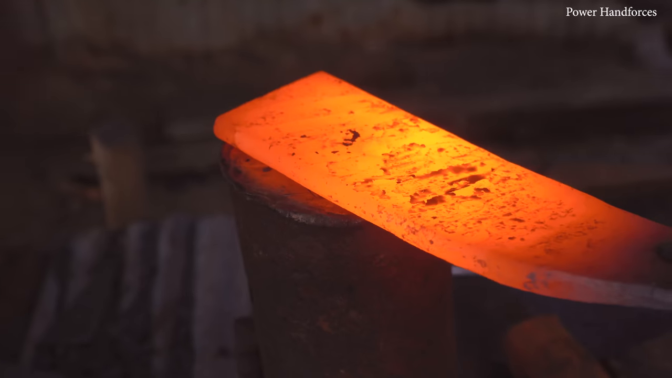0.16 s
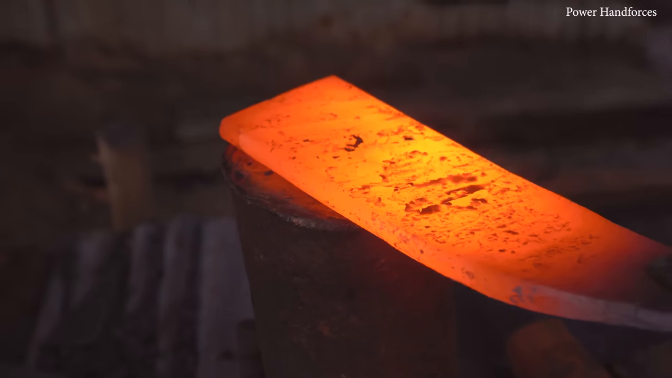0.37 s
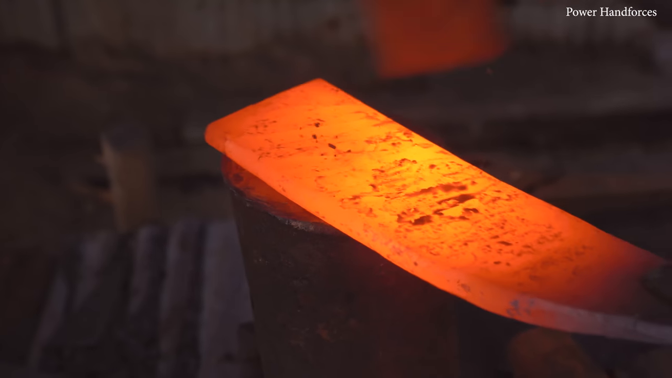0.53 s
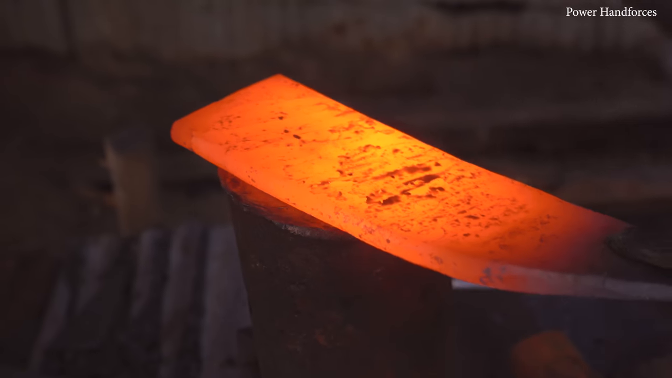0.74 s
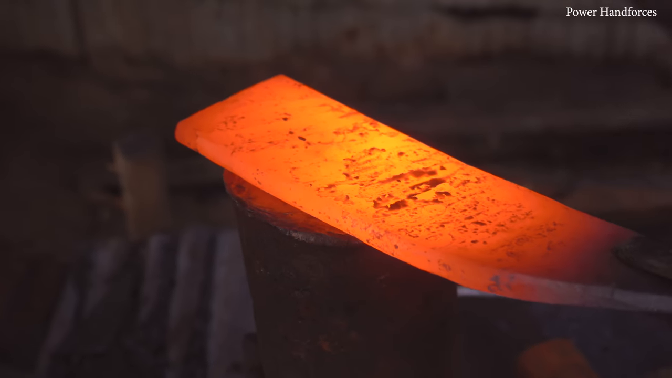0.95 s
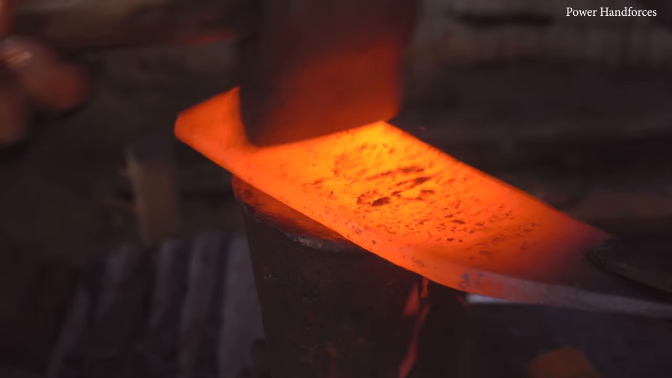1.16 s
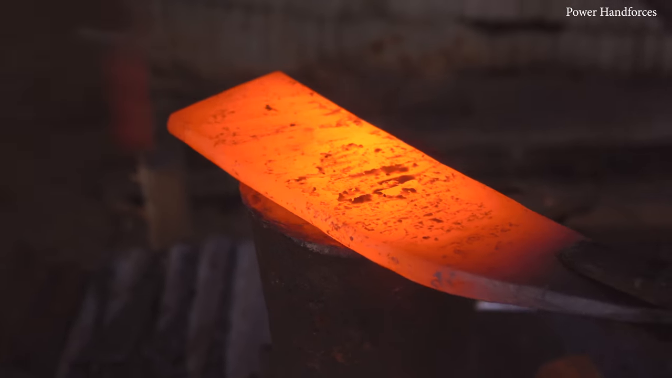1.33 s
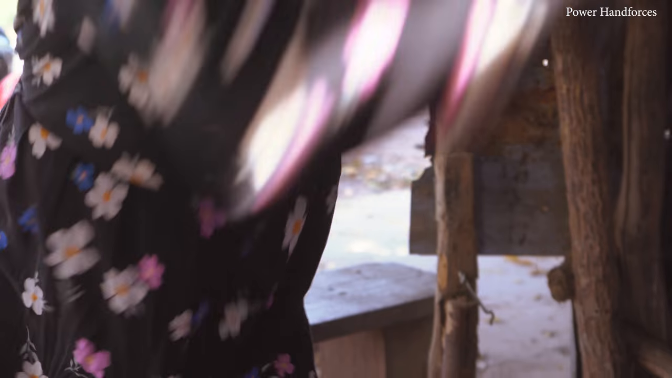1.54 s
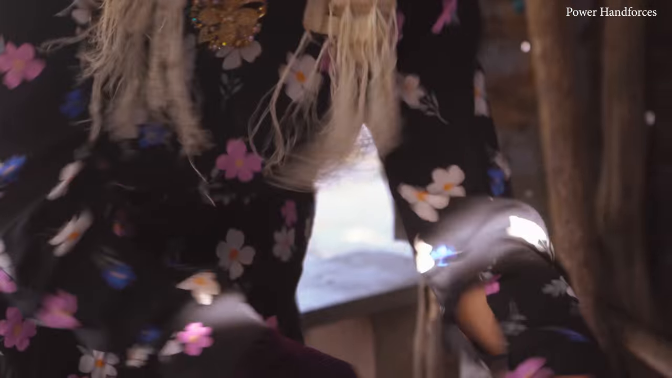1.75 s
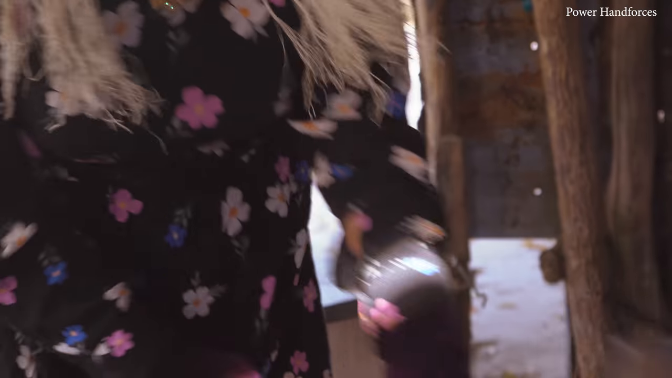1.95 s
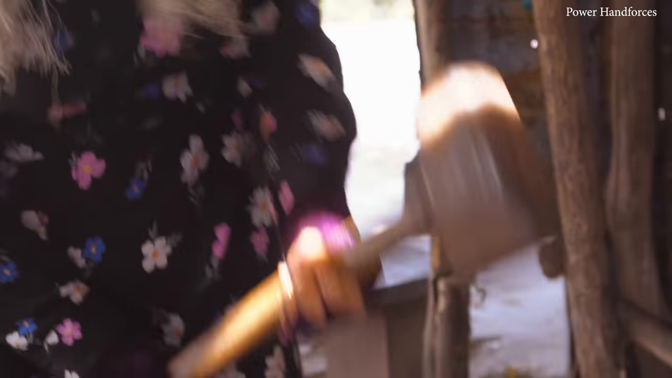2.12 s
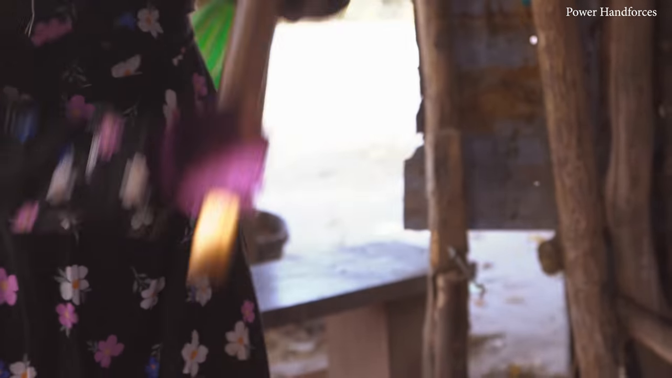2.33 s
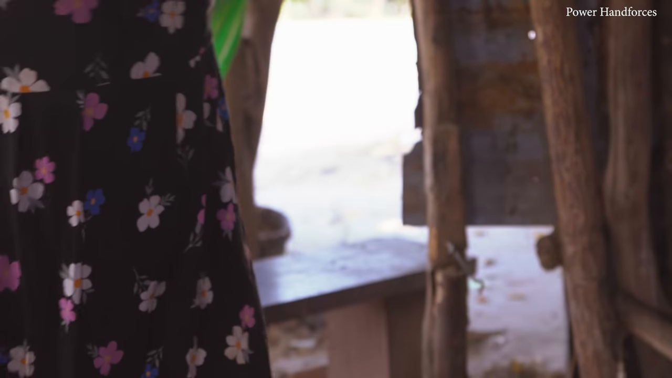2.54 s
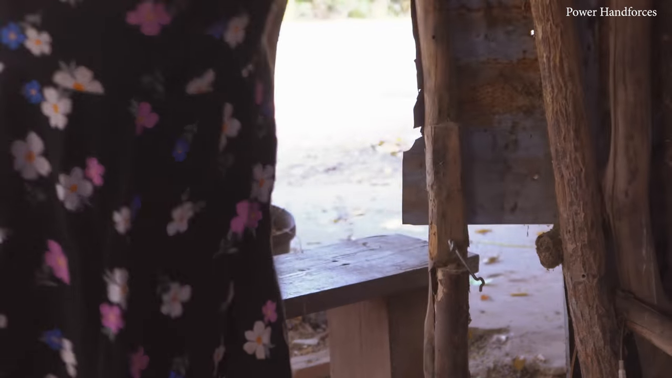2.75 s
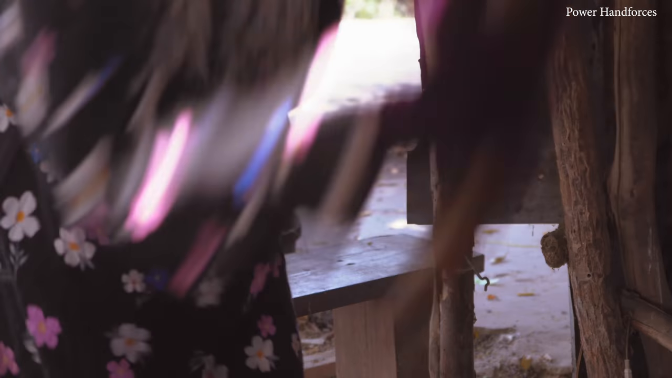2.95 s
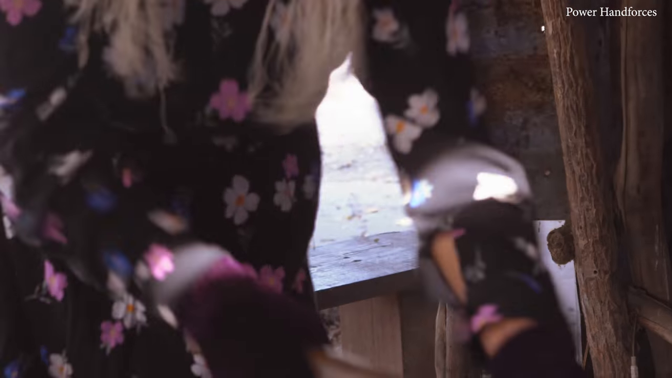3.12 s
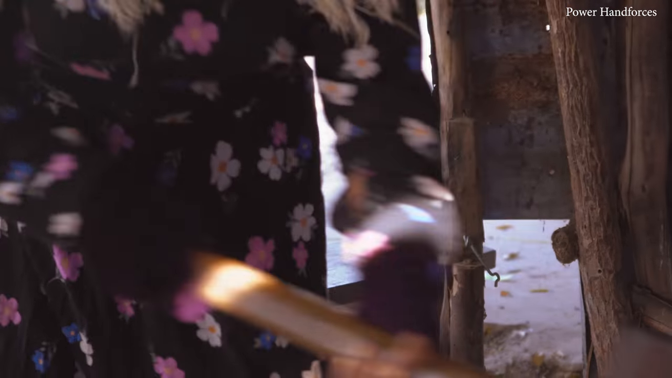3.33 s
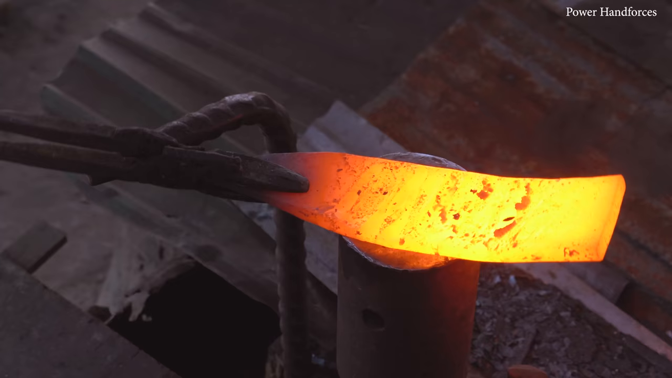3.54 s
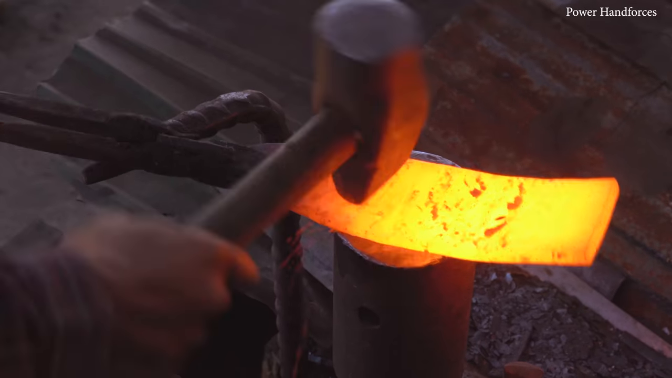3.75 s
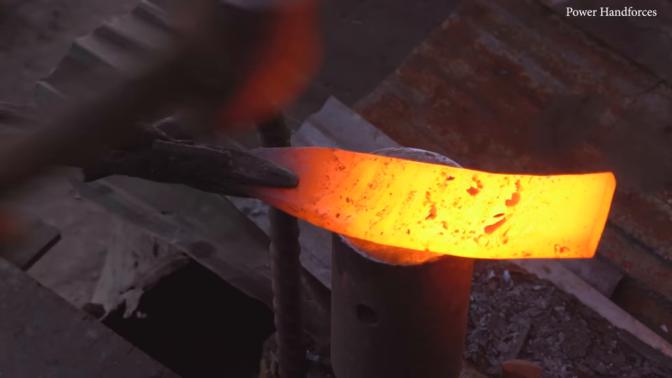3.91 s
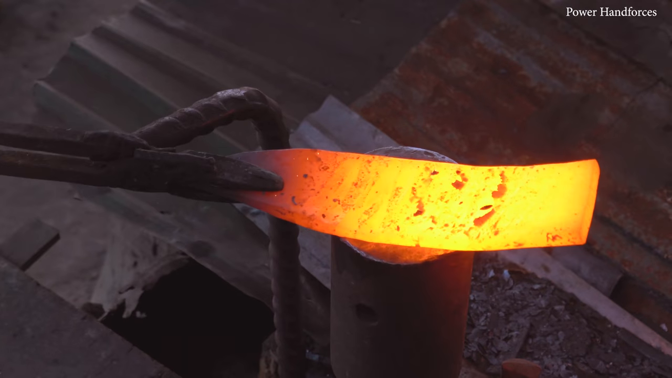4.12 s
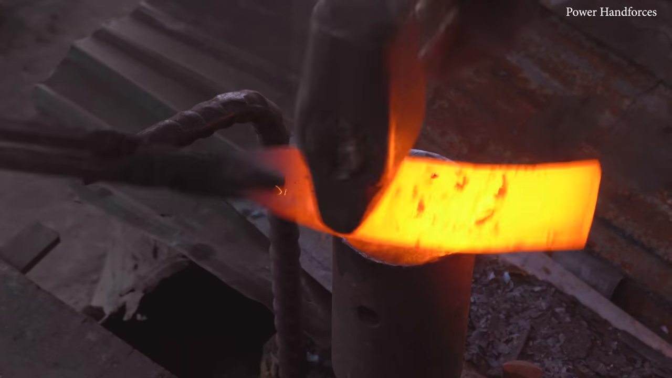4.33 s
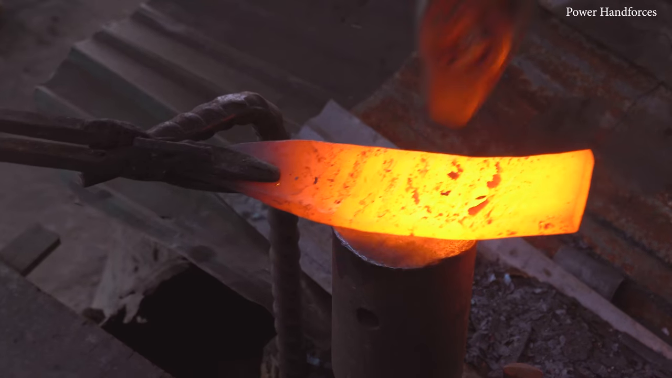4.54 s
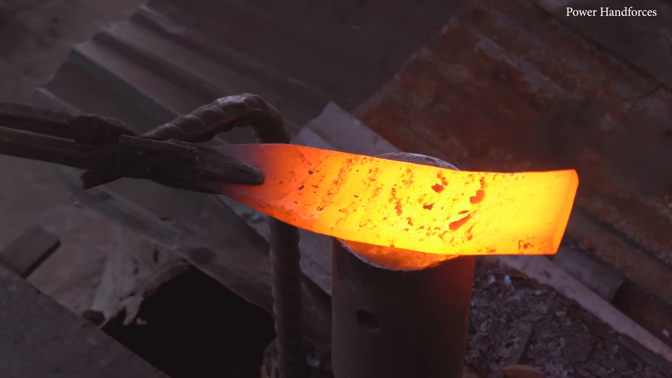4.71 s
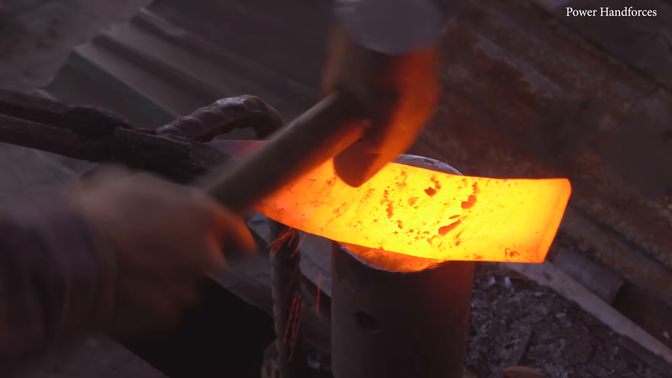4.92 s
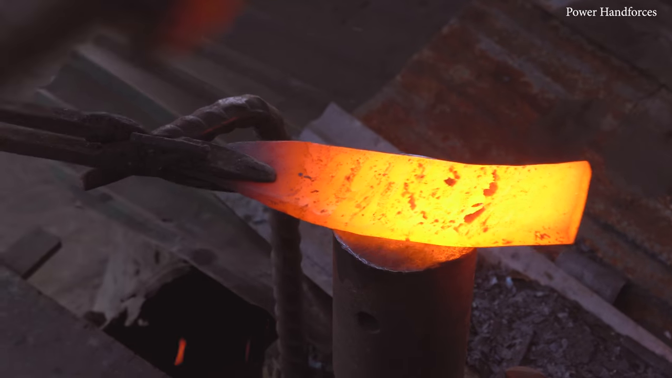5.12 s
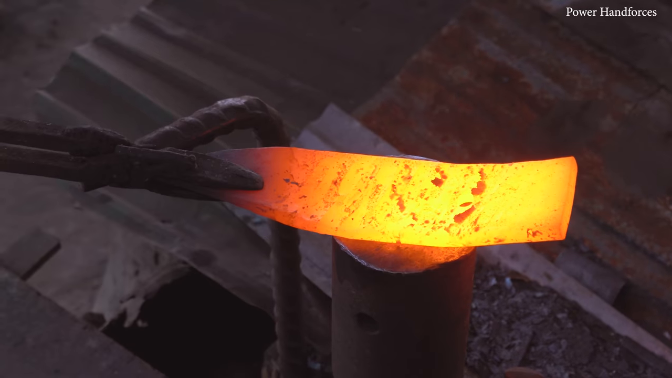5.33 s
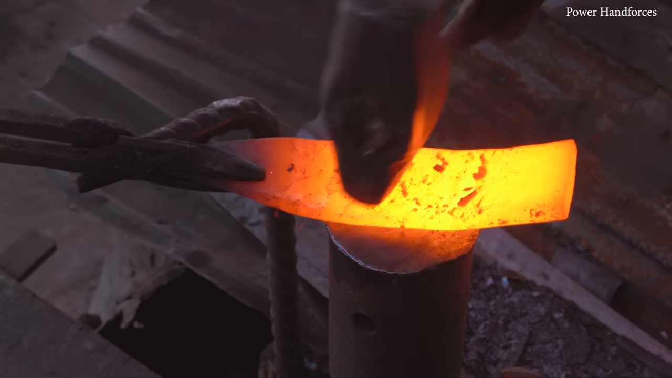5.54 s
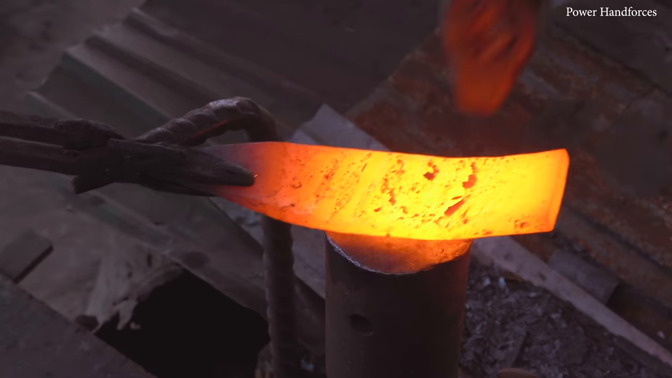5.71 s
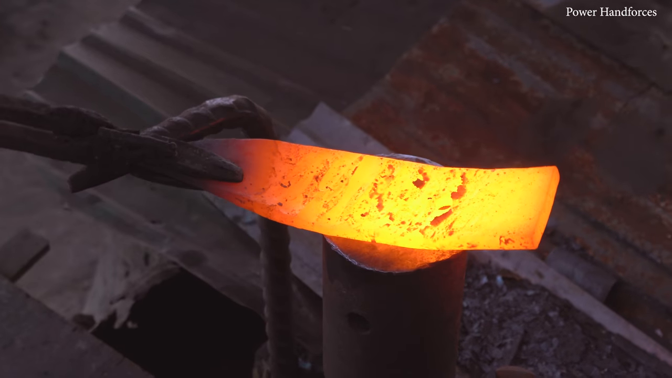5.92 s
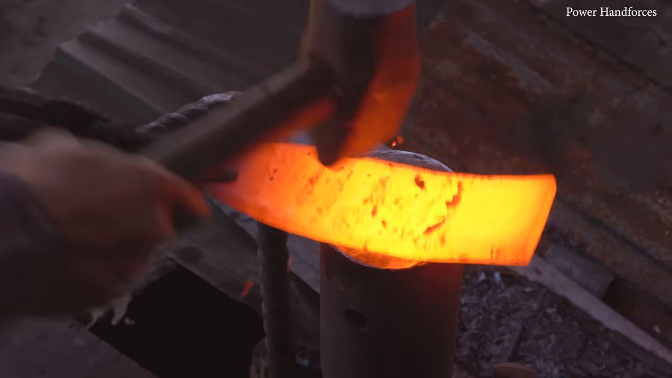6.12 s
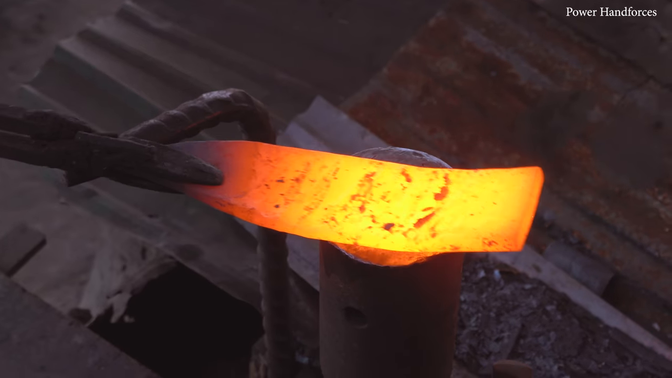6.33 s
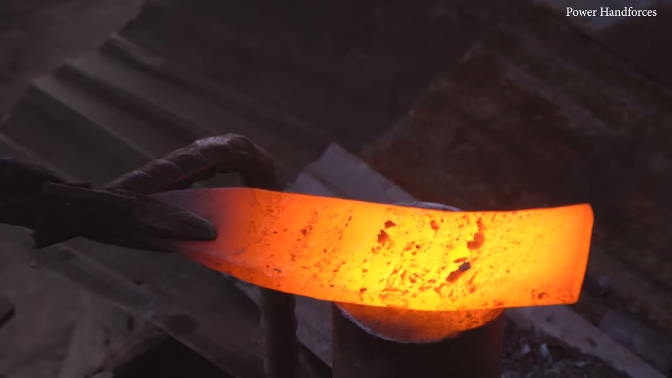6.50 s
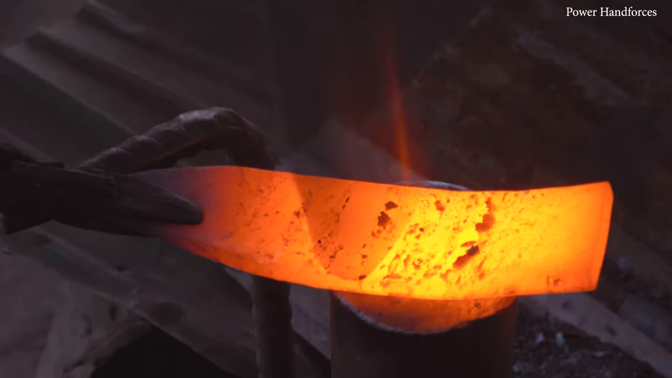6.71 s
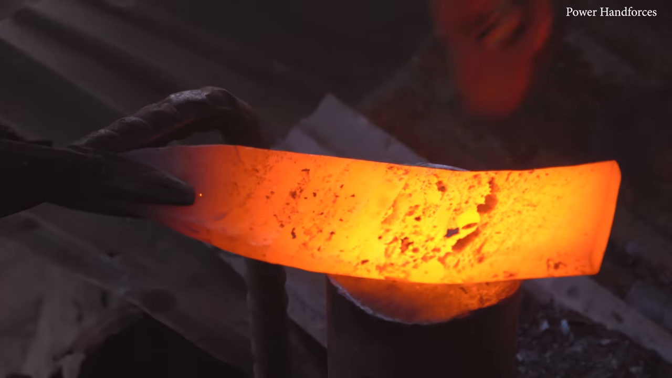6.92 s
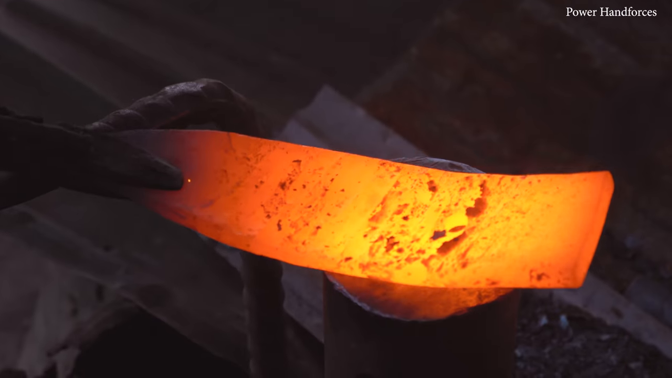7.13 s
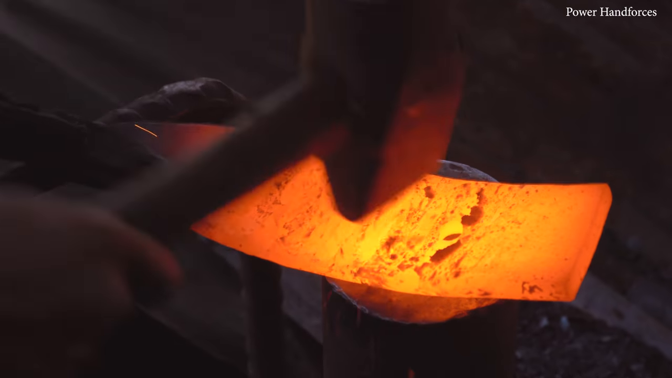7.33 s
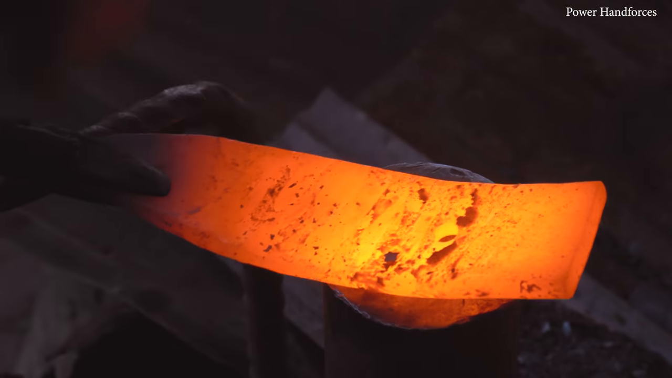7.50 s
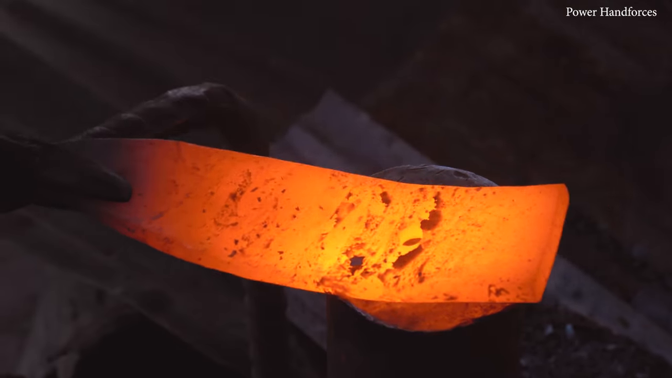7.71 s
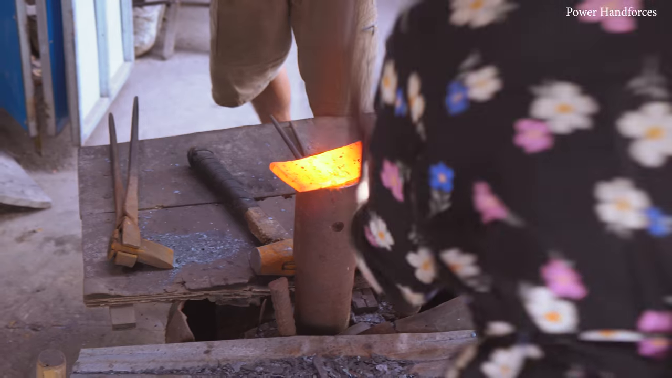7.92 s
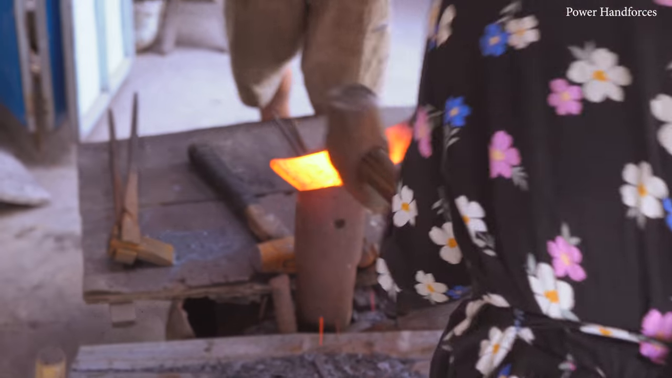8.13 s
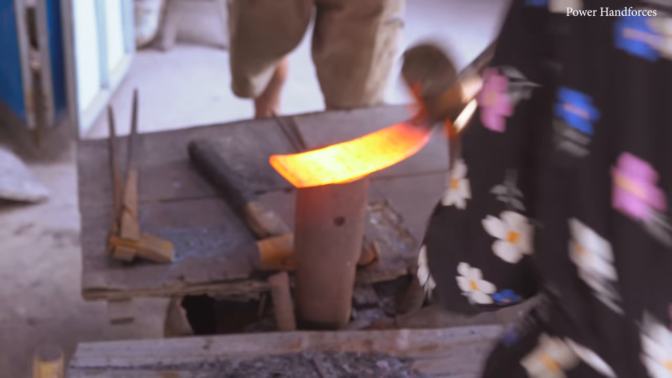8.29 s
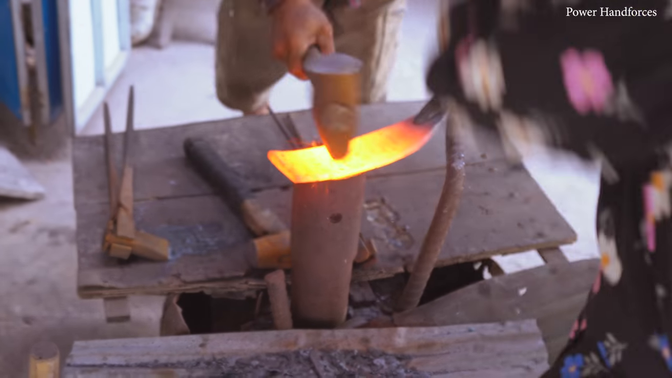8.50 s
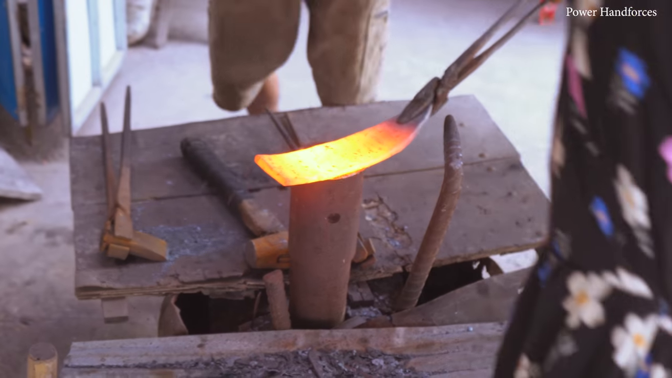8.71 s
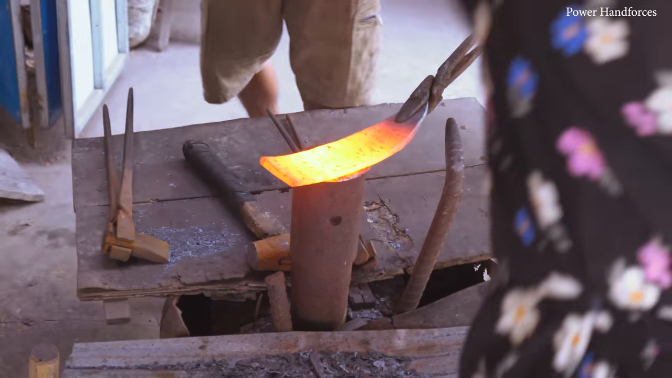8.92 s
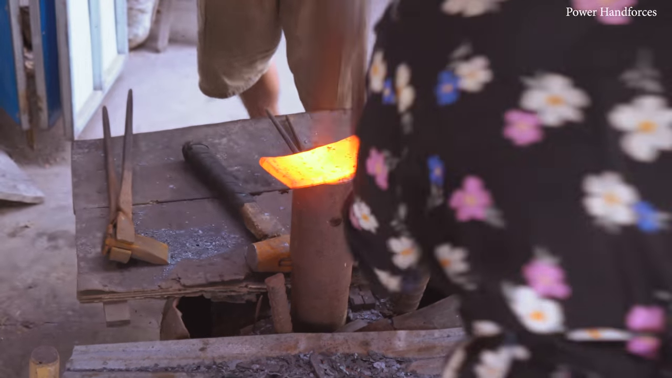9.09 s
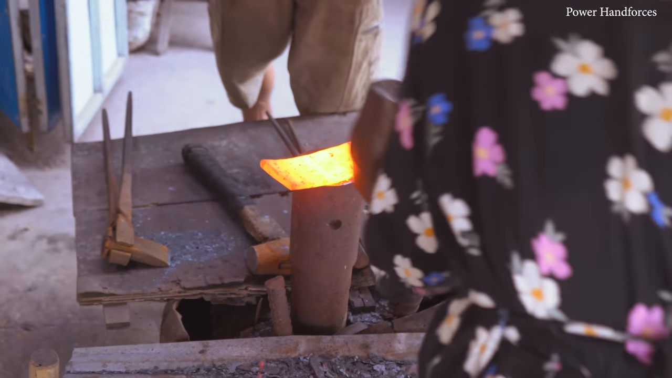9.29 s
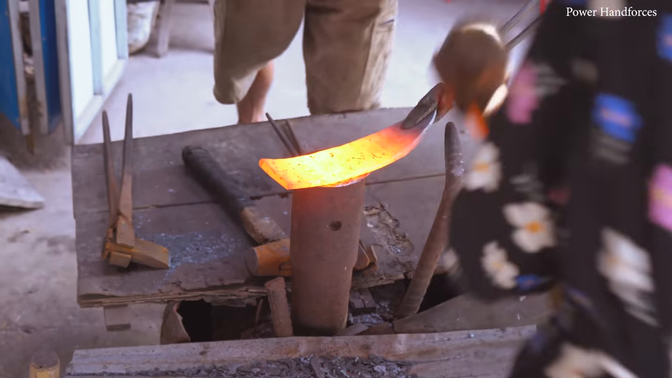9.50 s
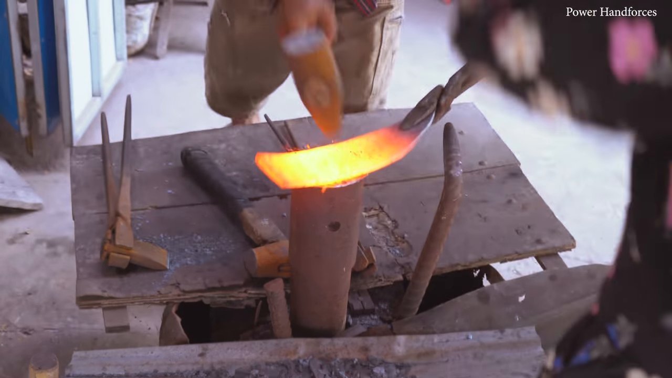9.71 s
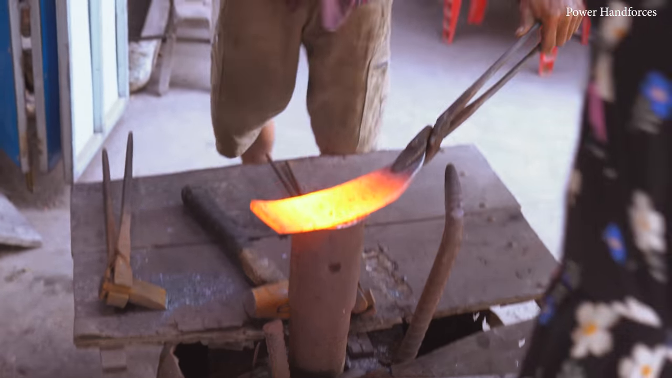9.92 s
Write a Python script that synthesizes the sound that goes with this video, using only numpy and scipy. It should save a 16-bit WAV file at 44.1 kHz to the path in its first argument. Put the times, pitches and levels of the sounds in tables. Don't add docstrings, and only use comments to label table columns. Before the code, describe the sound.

Two hammers take turns striking hot steel, hard ringing cracks about every 0.6 seconds, a metal shed answering briefly, traffic faint behind.

```python
import sys
import numpy as np
from scipy import signal
from scipy.fft import rfft, irfft, next_fast_len
from scipy.io import wavfile
from scipy.ndimage import uniform_filter1d, map_coordinates

SR = 44100
rng = np.random.default_rng(int(sys.argv[2]) if len(sys.argv) > 2 else 0)


def log_audio(samples):
    frames = np.atleast_2d(samples).T
    limited = np.clip(frames, -1, 1)
    pcm = np.round(limited * 32767).astype(np.int16)
    wavfile.write(sys.argv[1], SR, pcm)


def invert_db(x):
    u = np.asarray(x, float) / 20
    return 10 ** u


N = 438794

# start in seconds, then levels in dB of shed,
# sledge side, hand hammer side, steel bar.
BLOWS = [(0.0474, -15, -35.5, -57, -42), (0.588, -14, -38.5, -40, -38), (1.2533, -16, -35.5, -62, -47),
         (1.8394, -15.5, -38, -56, -37), (2.438, -15.5, -45, -34, -35.5), (3.215, -13.5, -37, -66, -60),
         (3.89, -16.5, -47.5, -35.5, -38), (4.484, -16, -37.5, -41, -54), (5.047, -17, -49, -46, -39),
         (5.655, -15.5, -36.5, -53, -46), (6.218, -16, -45, -33, -41), (6.872, -16, -41, -49, -56),
         (7.436, -19, -48, -40, -32.5), (8.079, -16, -47, -44, -42.5), (8.639, -17, -58, -34, -48),
         (9.246, -17.5, -46.5, -60, -44), (9.815, -18, -51, -35, -34.5)]
# ping peak in dB, ping pitch in Hz, brightness in dB per octave,
# hammer face colour in dB.
LANDINGS = [(-22, 2210, -0.3, 4), (-21.5, 1340, 0.36, -2.5), (-28, 2100, -0.75, 7), (-16, 1800, 0.2, -1.5),
            (-13.5, 1870, 0.17, 0), (-9.5, 1800, 0.4, 0.3), (-12, 1340, 0.6, 2.5), (-5, 2070, -0.2, -2.5),
            (-7.5, 1930, 0.76, -0.5), (-6.5, 2100, 0.05, -2.5), (-1, 3200, 0.55, -0.2),
            (-6.5, 2020, 0.13, -2), (-9.5, 1450, 0.1, -1.7), (-8, 1900, -0.2, 0.5), (-10, 1520, 0, -2),
            (-2.5, 1910, -0.5, -4.5), (-9, 1800, -0.8, 1.5)]
# pitch in Hz, level in dB, t60 in seconds.
BODY_MODES = [
    [(327, 0.1, .4), (657, -6, .33), (495, -8, .35), (527, -9, .33), (760, -8, .35)],
    [(1393, 0.1, .3), (1930, -6, .2)],
    [(5755, 1, .3), (7185, -8, .26), (4745, -11, .26)],
    [(8258, 1, .28), (2085, -9, .22)],
    [(13351, -3, .25), (9056, 0, .28), (11612, -10, .22)],
]
# start in seconds, level
# in dB, brightness in dB per octave, t60 in seconds.
SNAPS = [(1.336, -11.5, -2, .012), (1.588, -52, 8, 0.033), (4.997, -31, -0.5, 0.029), (7.47, -22, 1, .008),
         (2.4455, -17, 12, 0.012), (7.748, -51, 5, 0.074), (7.788, -54, 5, 0.069)]
# start in seconds, peak in dB, brightness in dB per octave, t60 in seconds.
TICKS = [(0.31, -41, 2.5, .17), (0.3594, -47, 13, .15), (0.408, -36.5, 4, 0.14), (0.46, -41.5, 0, 0.58),
         (0.8734, -30.5, 2.5, 0.11), (0.9901, -44, 0.5, .15), (1.0694, -51, 15, .15),
         (1.3343, -15, -1.5, 0.062), (1.4686, -26.5, 1, .22), (1.5194, -45, -2.5, .15),
         (3.05, -41, -5, .15), (3.6494, -30, 5, 0.062), (4.232, -40, 10, 0.2), (4.999, -28.5, 0, .18),
         (5.3313, -33.5, 5, 0.12), (5.399, -39, 4.5, .15), (5.905, -28, 1.5, 0.12), (5.959, -38, 0, .15),
         (6.0394, -42, 3, 0.33), (6.1193, -35.5, 2, 0.39), (6.538, -37, 4, 0.12), (6.5794, -45, 8, 0.13),
         (6.6894, -54, 21, .15), (7.2894, -46.5, 8, 0.32), (7.36, -47.5, 2.5, 0.4),
         (7.4666, -10, -1, 0.075), (7.9674, -27, 1.5, 0.16), (8.3649, -33.5, 3, .15),
         (8.524, -22, 4, 0.075), (9.7212, -24, -1.5, .1)]
# start in seconds, level in dB, pitch in Hz, t60 in seconds.
CHINKS = [(1.21, -68, 11800, 0.11), (2.93, -60, 11200, .1), (6.628, -57, 11400, .12), (6.63, -66, 9750, .2),
          (8.526, -59, 10750, .12)]
# start in seconds, peak in dB, pitch in Hz, t60 in seconds.
THUDS = [(6.489, -46, 341, 0.22), (6.573, -52, 263, 0.092)]
# frequency in Hz, level in dB per Hz.
CRACK_SPECTRUM = [(120, -46), (200, -46.5), (728, -3), (1970, -0.5), (3190, -2), (4210, -7.5), (4970, -4.5),
                  (7880, -3.5), (10800, -16), (13700, -12), (16500, -42)]
# frequency in Hz, level in dB per Hz.
SHED_SPECTRUM = [(24, -80), (40, -54.5), (228, -13.5), (332, -12), (396, -7.5), (578, -5), (744, -1.5),
                 (1030, -4), (1170, -0.5), (1940, -3.5), (3550, -6.5), (7010, -1), (13800, -18.5),
                 (15300, -21.5), (16500, -58)]
# frequency in Hz, t60 in seconds.
SHED_T60 = [(150, 0.45), (500, 0.36), (1500, 0.32), (4000, 0.31), (8000, 0.28), (15000, 0.2)]
# frequency in Hz, t60 in seconds.
YARD_T60 = [(200, 1), (2000, 0.77), (8000, 0.58)]
# centre in Hz, half width in octaves.
PLACE_BANDS = [(2000, 0.13), (4900, 0.5)]
# frequency in Hz, left-right likeness from 0 to 1.
ALIKE = [(60, 0.95), (150, 1), (380, 0.98), (950, 0.8), (2380, 0.14), (5980, 0.24), (15000, 0.091)]
# frequency in Hz, left minus right in dB.
LEAN = [(60, 6.5), (150, 3.5), (380, 1.5), (950, -0.5), (2380, 1), (5980, -6.5), (15000, -6.5)]
# time in seconds, cover level in dB.
IDLE = [(3.55, -75), (3.62, -53), (4.2, -54), (4.45, -50), (4.95, -51), (5.5, -57), (6.0, -72), (6.85, -77),
        (6.95, -94)]
# pitch in Hz, level in dB, t60 in seconds.
COVER_MODES = [(3155, 0, .028), (3450, -9, .025), (4600, -13, .02)]
# pitch in Hz, level in dB, t60 in seconds.
BRACKET_MODES = [(1510, -3, .016), (1900, -1, .016), (2230, -1, .016), (1160, -6, .016)]
# start and end in seconds, first and last pitch in Hz.
DRONES = [(7.865, 9.5, 181, 185), (1.45, 3.61, 234, 228), (1.4, 2.45, 704, 702), (3.63, 6.87, 1500, 1476)]
# level in dB at start, middle and end, pitch waver as a share.
DRONE_LAW = [(-63.5, -59.5, -66, 0.0044), (-69, -63, -57.5, 0.038), (-65, -64, -68, .012),
             (-60, -71.5, -67.5, 0.0031)]
# time in seconds, roar level in dB.
STREET = [
    [(0, -58.5), (.5, -59.5), (1.2, -57), (1.7, -52), (2.6, -48.5), (3.61, -43.5)],
    [(3.62, -51.5), (4.4, -58.5), (5.3, -57.5), (5.7, -62.5), (6.4, -57.5), (6.9, -65), (7.85, -61)],
    [(7.86, -49), (8.6, -47.5), (9.3, -43), (9.64, -40), (9.95, -34.5)],
]
# frequency in Hz, level in dB per Hz.
RUMBLE_SPECTRUM = [(15, -64), (25, -41), (81, -10.5), (119, -4.5), (167, -8.5), (226, -4), (321, 0.5),
                   (450, -6), (580, -40), (990, -120)]
# frequency in Hz, level in dB per Hz.
ROAR_SPECTRUM = [(180, -32.5), (300, -18), (523, -0.5), (573, 0), (865, -2), (1460, 0), (1600, -0.5),
                 (3500, -8.5), (4550, -41), (7700, -120)]
# frequency in Hz, level in dB per Hz.
HISS_SPECTRUM = [(1650, -17), (2800, -4), (4500, -4), (5110, -3), (7570, -6.5), (10600, -21.5),
                 (15100, -25), (16100, -27), (16500, -50)]
# frequency in Hz, left-right likeness from 0 to 1.
FAR_ALIKE = [(60, 0.92), (150, 1), (380, 0.95), (950, 0.56), (2380, 0.066), (5980, 0.15), (15000, 0.1)]
# frequency in Hz, left minus right in dB.
FAR_LEAN = [(60, -.3), (150, -1.5), (380, -0.5), (950, -2), (2380, 2), (5980, -5), (15000, -7.5)]
# frequency in Hz, level in dB per Hz.
SELF_SPECTRUM = [(15, -67.5), (25, -33), (48, -22), (65, 1.5), (102, -16), (200, 0.5), (260, -42),
                 (440, -120)]
CUTS_S = [3.615, 7.862]

CRACK_DB, STAND_DB, PAN_DB = (-3.5, -3, -3.5), (0.6, 0, -1), (-1.2, 0.3, .3)
RELEASE_S = (0.052, 0.042, .035)
RUMBLE_DB, HISS_DB = (-9.5, -13.5, -9.5), (-4.5, 6.5, -1)
RUMBLE_GROWS, HISS_GROWS = (1, 0.46, 0.59), (0.95, 1.52, 0.63)

SIDE_DB = (-1.5, -3, -1.5, -9)
ENGINE_S, KNOCKS_PER_S = (3.538, 6.95), 43.3


def unit(x):
    return x / np.sqrt(np.mean(x ** 2) + 1e-20)


def along(points, hz):
    f, v = np.transpose(points)
    return np.interp(np.log(hz + 1), np.log(f + 1), v)


def curve(rows):
    s, v = np.transpose(rows)
    return np.interp(np.arange(N) / SR, s, v)


def wobble(rate, size, order=3):
    knots = rng.standard_normal(int(size * rate / SR) + 4)
    return map_coordinates(knots, [np.arange(size) * rate / SR], order=order)


def pair(size, spectrum, alike, lean, tilt_db=0):
    hz = np.fft.rfftfreq(size, 1 / SR)
    turn = np.arccos(np.clip(along(alike, hz), -1, 1)) / 2
    mid, side = rfft(rng.standard_normal((2, size))) * [np.cos(turn), np.sin(turn)]
    colour_db = along(spectrum, hz) + tilt_db * np.log2((hz + 1) / 2000)
    colour_db = colour_db + np.outer([.5, -.5], along(lean, hz))
    return unit(irfft(invert_db(colour_db) * [mid + side, mid - side], size))


def near(size, spectrum, tilt_db):
    return pair(size, spectrum, ALIKE, LEAN, tilt_db)


def shaped(x, gain):
    hz, t, z = signal.stft(x, SR, nperseg=256)
    return signal.istft(z * gain(hz[:, None], t), SR, nperseg=256)[1][..., :x.shape[-1]]


def add(track, s, sound):
    start = round(s * SR)
    track[:, start:start + sound.shape[1]] += sound


def sharp(x):
    return signal.sosfilt(signal.butter(2, 450, "highpass", fs=SR, output="sos"), x)


def duck():
    depth_db, recover_s = -18, .2
    now = np.arange(N) / SR
    blows_s = np.array([0] + [row[0] for row in BLOWS])
    last_s = blows_s[np.searchsorted(blows_s, now, "right") - 1]
    return depth_db * np.exp(-(now - last_s) / recover_s)


def ring(modes, t, flutter_db):
    scatter_db = 1.5
    out = np.zeros((2, len(t)))
    for hz, db, t60 in modes:
        swell, shared, left, right = (wobble(49, size=len(t), order=1) for _ in range(4))
        drift = 1.4 * shared + min(1, hz / 2500) * np.array([left, right])
        lean_db = np.array([[.5], [-.5]]) * along(LEAN, hz)
        level_db = db + scatter_db * rng.standard_normal() + flutter_db * swell + lean_db
        out += invert_db(level_db - 60 * t / t60) * np.sin(2 * np.pi * hz * t + drift)
    return out


def shed_answer(size, shed_db, tilt_db, blade_db, face_db):
    clumps_db = 2.2 * rng.standard_normal((129, 1))

    def fade(hz, t):
        colour_db = clumps_db
        for db, (centre_hz, octaves) in zip((blade_db, face_db), PLACE_BANDS):
            colour_db = colour_db + db * np.exp(-(np.log2((hz + 1) / centre_hz) / octaves) ** 2)
        shed = invert_db(-60 * t / along(SHED_T60, hz))
        yard = invert_db(-24 - 60 * t / along(YARD_T60, hz))
        return invert_db(colour_db) * (shed + yard)

    return invert_db(shed_db + 5.5) * shaped(near(size, SHED_SPECTRUM, tilt_db), fade)


def direct_crack(tilt_db, face_db):
    brightens, echo_s, echo_db = .15, .0058, -8
    t = np.arange(2048) / SR
    burst = invert_db(8.5 - 60 * t / .006) + invert_db(-9 * (t / .005) ** 1.6)
    noise = near(len(t), CRACK_SPECTRUM, tilt_db + brightens * face_db)
    crack = sharp(noise * burst * (1 - np.exp(-t / 0.00024)))
    crack = crack + invert_db(echo_db) * np.roll(crack[::-1], round(echo_s * SR), axis=1)
    return crack / np.std(crack[:, :300])


def hammers():
    track, t = np.zeros((2, N + SR)), np.arange(32768) / SR
    ring_t = t[:20480]
    for (s, shed_db, heavy_db, hand_db, bar_db), (_, _, tilt_db, face_db) in zip(BLOWS, LANDINGS):
        take = np.searchsorted(CUTS_S, s)
        rings_db = (heavy_db + SIDE_DB[0] + STAND_DB[take], hand_db + SIDE_DB[1], bar_db,
                    heavy_db + SIDE_DB[2], hand_db + SIDE_DB[3])
        blade_db = 7 + 0.1 * np.clip(heavy_db - hand_db, -15, 15)
        shed = shed_answer(len(t), shed_db, tilt_db, blade_db, face_db)
        for db, modes in zip(rings_db, BODY_MODES):
            add(shed, 0, invert_db(db + 14.5) * ring(modes, ring_t, flutter_db=3.5))
        grip_db = -15 * np.clip(1 - t / RELEASE_S[take], 0, 1) ** 1.08
        grip = invert_db(grip_db) * (1 - np.exp(-t / 0.003))
        side = invert_db(np.array([[.5], [-.5]]) * PAN_DB[take])
        crack_db = CRACK_DB[take] + 0.12 * face_db - 11
        add(track, s + .0008, side * grip * shed)
        add(track, s + .0008, side * invert_db(crack_db) * direct_crack(tilt_db, face_db))
    return track[:, :N]


def blade():
    ping_t60, click_hz, click_t60 = 0.019, 4830, .009
    track, t = np.zeros((2, N + SR)), np.arange(2048) / SR
    for (s, *_), (db, hz, _, face_db) in zip(BLOWS, LANDINGS):
        click_db = -13.5 + 1.6 * face_db
        modes = [(hz, db - 0.5, ping_t60), (click_hz, click_db, click_t60)]
        add(track, s + 0.00064, ring(modes, t, flutter_db=1) * (1 - np.exp(-t / 0.00033)))
    for s, db, tilt_db, t60 in SNAPS:
        add(track, s, invert_db(db - 60 * t / t60) * near(len(t), CRACK_SPECTRUM, tilt_db))
    return sharp(track[:, :N])


def ticks():
    rise_s, snap_db = 0.0034, -10.5
    track, t = np.zeros((2, N + SR)), np.arange(8192) / SR
    snap = invert_db(snap_db + 5.5 - 60 * t / 0.017)
    for s, db, tilt_db, t60 in TICKS:
        fall = (1 - np.exp(-t / rise_s)) * (invert_db(-60 * t / t60) + invert_db(-15 - 60 * t / 0.27))
        add(track, s, invert_db(db - 11.5) * (fall + snap) * near(len(t), SHED_SPECTRUM, tilt_db))
    for s, db, hz, t60 in CHINKS + THUDS:
        add(track, s, ring([(hz, db + 0.5, t60)], t, flutter_db=-1) * (1 - np.exp(-t / .004)))
    return track[:, :N]


def struck(modes, t):
    out = sum(invert_db(db - 60 * t / t60) * np.sin(2 * np.pi * hz * t) for hz, db, t60 in modes)
    return (out * (1 - np.exp(-t / 0.00084)))[None]


def engine():
    t, now = np.arange(4096) / SR, np.arange(N) / SR
    s = np.arange(*ENGINE_S, 1 / KNOCKS_PER_S)
    chance = rng.standard_normal((len(s), 2))
    at = np.round((s + .0004 * chance[:, 0]) * SR).astype(int)
    knocks = np.bincount(at, invert_db(2.2 * chance[:, 1]), N)
    gate = signal.fftconvolve(knocks, invert_db(-60 * t / 0.044))[:N]
    buzz = 0.055 * (1 + gate) * rng.standard_normal((2, N))
    cover_db = curve(IDLE) + duck()
    bracket_db = -57.5 + 0.8 * (cover_db - cover_db.max())
    drive = np.array([knocks, np.roll(knocks, shift=3)]) + .22 * buzz
    cover = signal.fftconvolve(drive, struck(COVER_MODES, t), axes=1)[:, :N]
    bracket = signal.fftconvolve(buzz, struck(BRACKET_MODES, t), axes=1)[:, :N]
    heard = (now > ENGINE_S[0]) & (now < ENGINE_S[1])
    cover = invert_db(cover_db + 17.5) * cover * invert_db([[-1.5], [1.5]])
    return heard * (cover + invert_db(bracket_db + 16.5) * bracket)


def motor():
    out, now = 0, np.arange(N) / SR
    for (start, end, first_hz, last_hz), (*levels_db, waver) in zip(DRONES, DRONE_LAW):
        on = np.clip(np.minimum(now - start, end - now) / 0.033, 0, 1)
        level_db = np.interp(now, [start, (start + end) / 2, end], levels_db)
        level_db = level_db + 6.5 + 1.3 * wobble(23, size=N)
        hz = np.interp(now, [start, end], [first_hz, last_hz]) * (1 + waver * wobble(13, size=N))
        out = out + on * invert_db(level_db) * np.sin(2 * np.pi * np.cumsum(hz) / SR)
    return out * invert_db(0.57 * duck())


def traffic_band(level_db, spectrum, patchy_db):
    def patches(hz, t):
        grain = rng.standard_normal((len(hz), len(t)))
        return invert_db(patchy_db * unit(uniform_filter1d(uniform_filter1d(grain, 4, 0), 24, 1)))

    noise = shaped(pair(next_fast_len(N), spectrum, FAR_ALIKE, FAR_LEAN), patches)[:, :N]
    return invert_db(level_db + 0.22 * wobble(5.4, size=N)) * unit(noise)


def street():
    take = np.searchsorted(CUTS_S, np.arange(N) / SR)
    roar_db = np.choose(take, [curve(rows) for rows in STREET])
    first_db = np.array([rows[0][1] for rows in STREET])[take]
    growth_db = roar_db - first_db
    rumble_db = first_db + np.take(RUMBLE_DB, take) + np.take(RUMBLE_GROWS, take) * growth_db
    hiss_db = first_db + np.take(HISS_DB, take) + np.take(HISS_GROWS, take) * growth_db
    rumble = traffic_band(rumble_db, RUMBLE_SPECTRUM, patchy_db=1.5)
    roar = traffic_band(roar_db, ROAR_SPECTRUM, patchy_db=1.2)
    hiss = traffic_band(hiss_db, HISS_SPECTRUM, patchy_db=.8)
    return rumble + roar + hiss


def scene():
    return hammers() + blade() + ticks() + engine() + motor() + street()


def band_limit(x):
    return signal.sosfilt(signal.butter(12, 17000, fs=SR, output="sos"), x)


def record(dry):
    thin = signal.sosfilt(signal.butter(3, 110, "highpass", fs=SR, output="sos"), dry)
    apart = thin - thin.mean(axis=0)
    thin = thin - signal.sosfilt(signal.butter(1, 250, fs=SR, output="sos"), apart)
    own = invert_db(-76) * pair(next_fast_len(N), SELF_SPECTRUM, [(50, 1.0)], [(50, .1)])[:, :N]
    mix = np.clip(thin + own, -.93, .93)
    return band_limit(mix)


dry = scene()
out = record(dry)
log_audio(out)
```